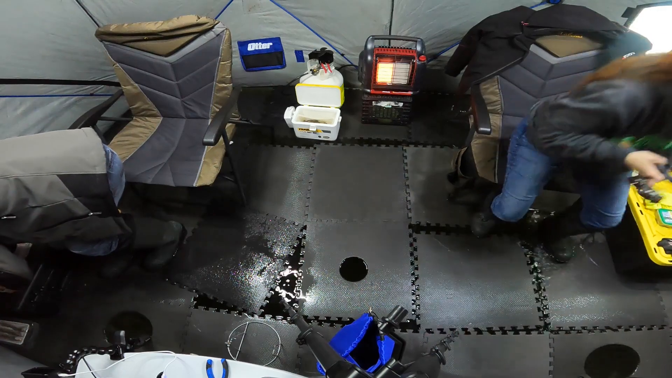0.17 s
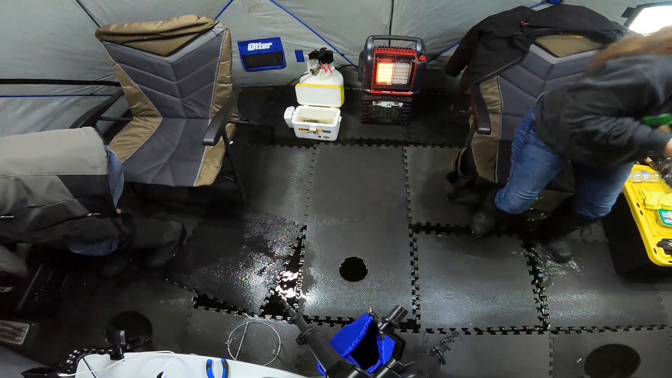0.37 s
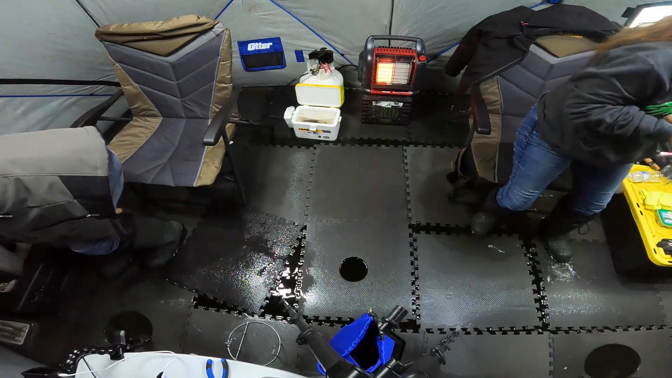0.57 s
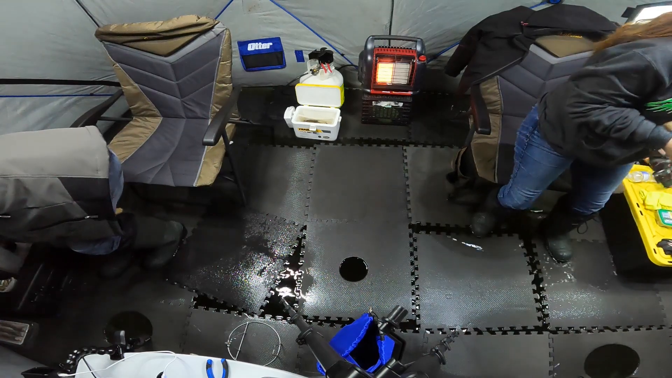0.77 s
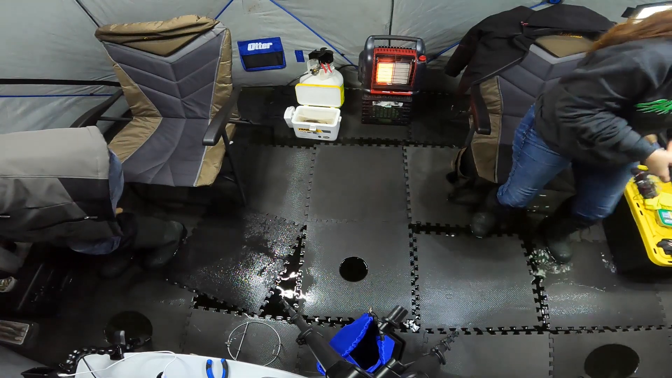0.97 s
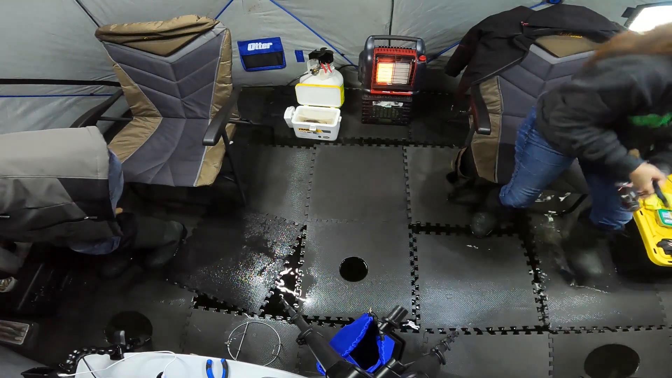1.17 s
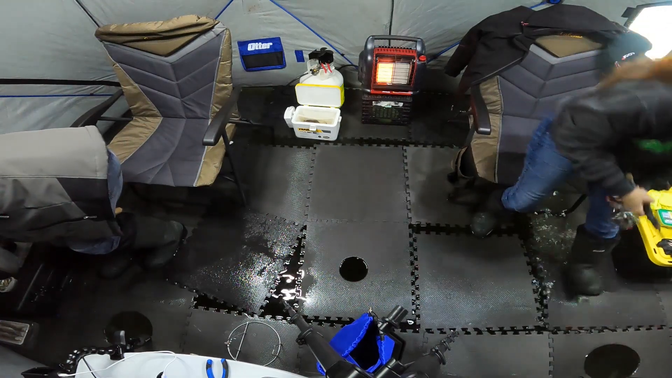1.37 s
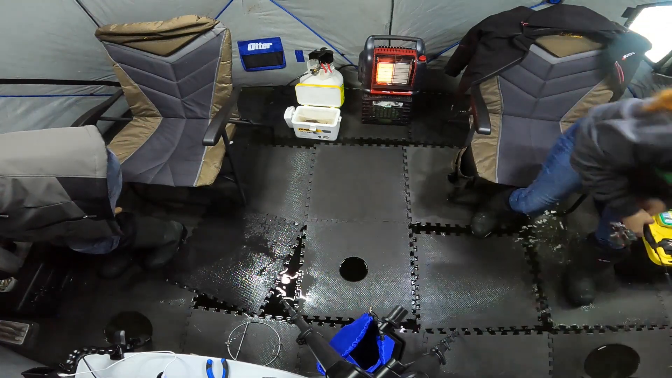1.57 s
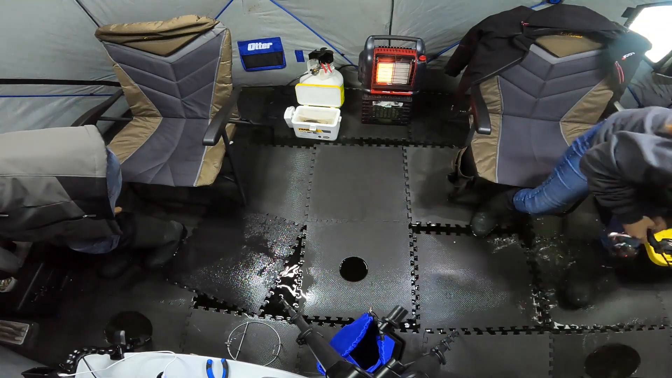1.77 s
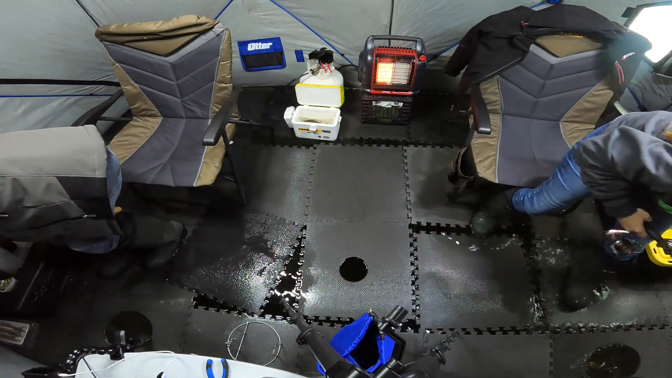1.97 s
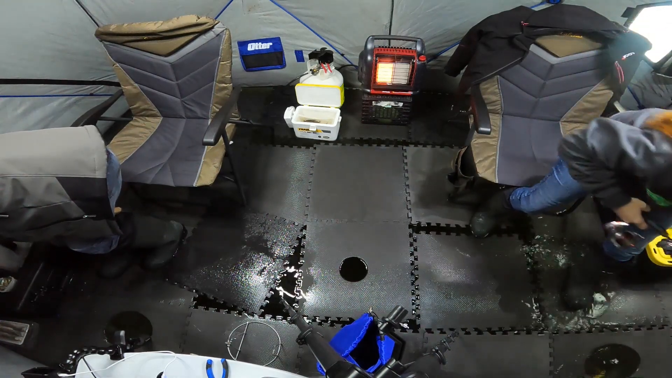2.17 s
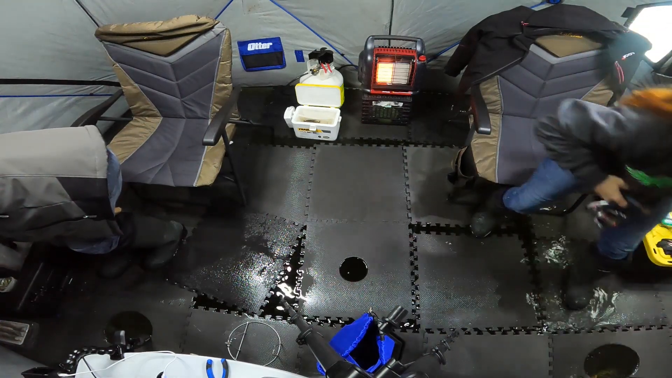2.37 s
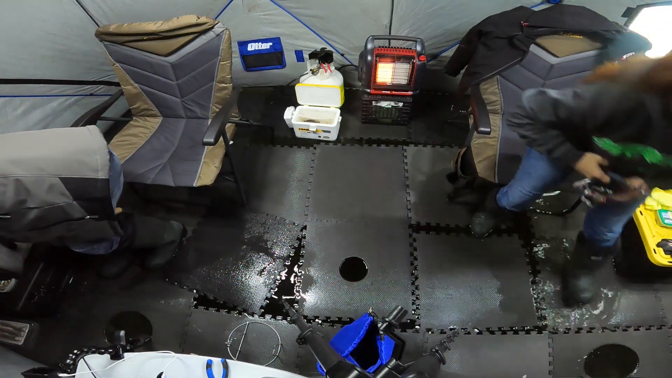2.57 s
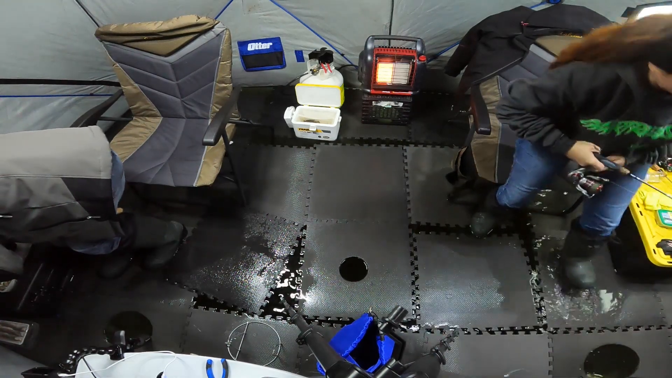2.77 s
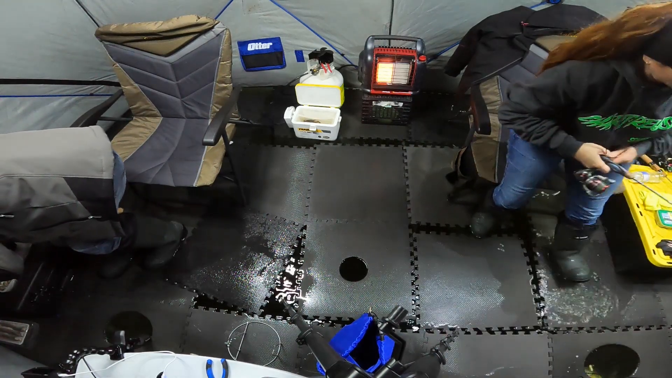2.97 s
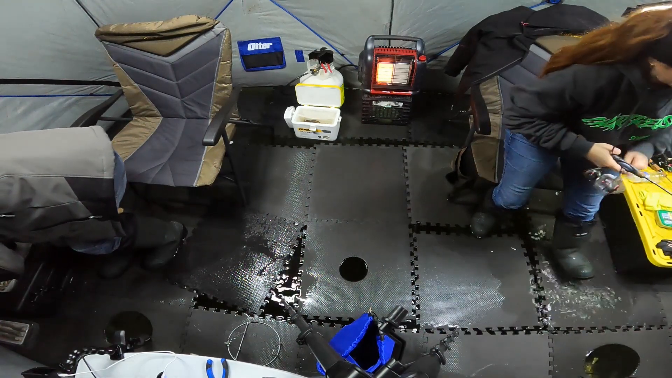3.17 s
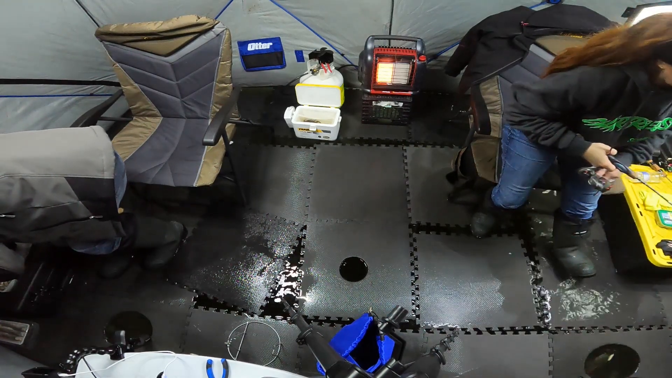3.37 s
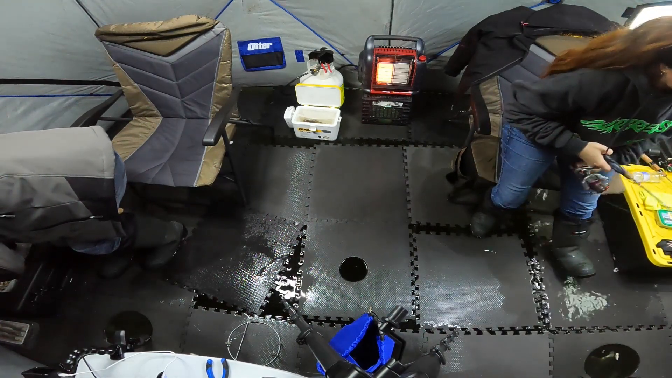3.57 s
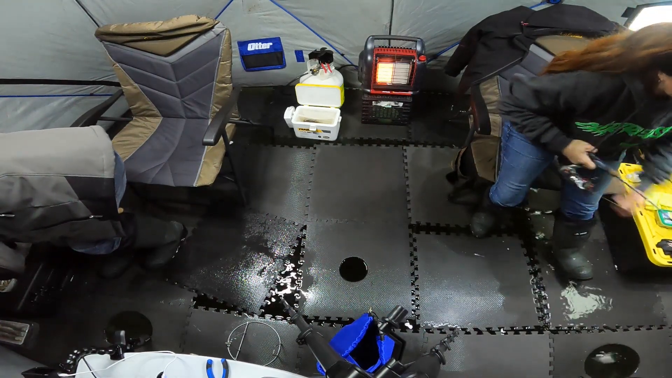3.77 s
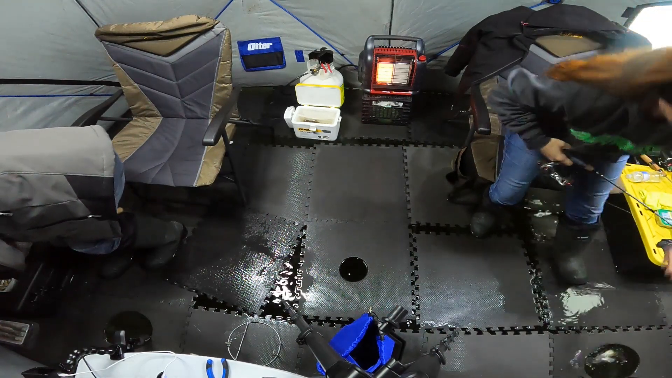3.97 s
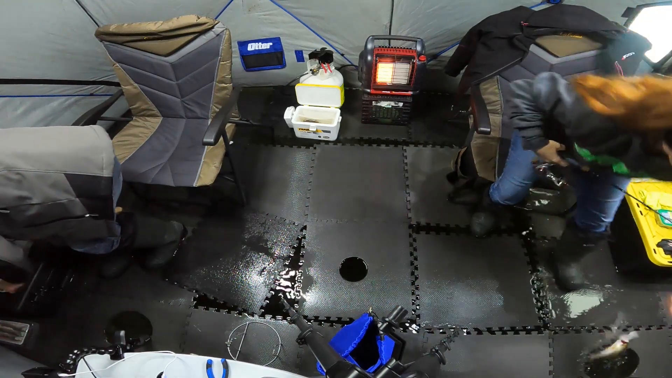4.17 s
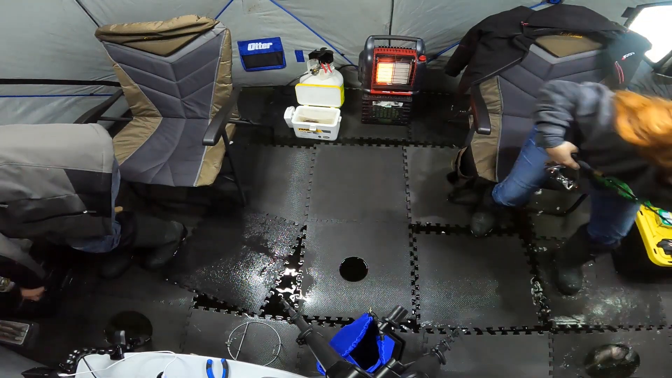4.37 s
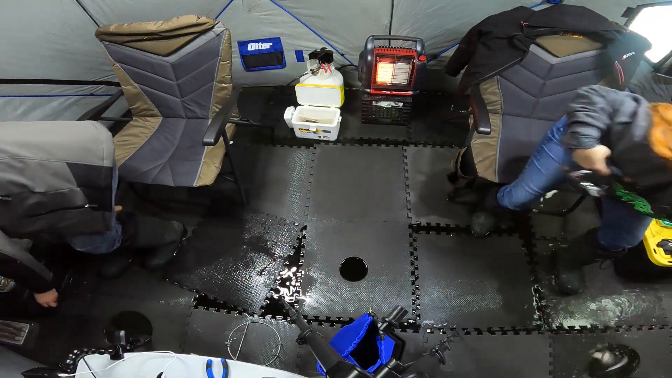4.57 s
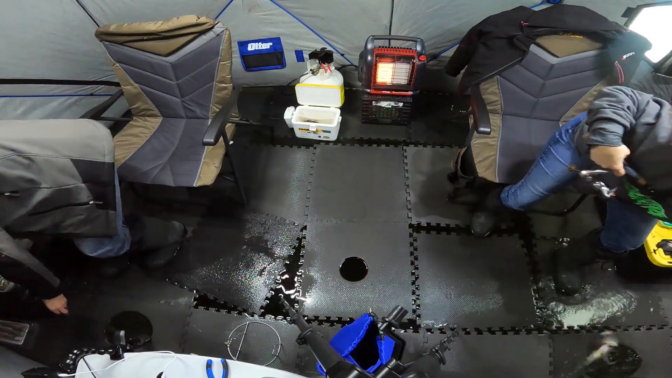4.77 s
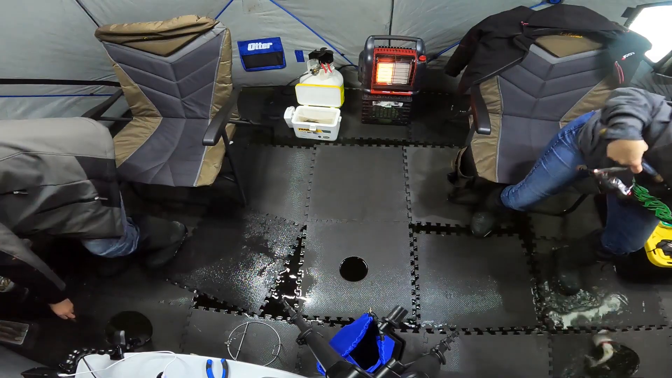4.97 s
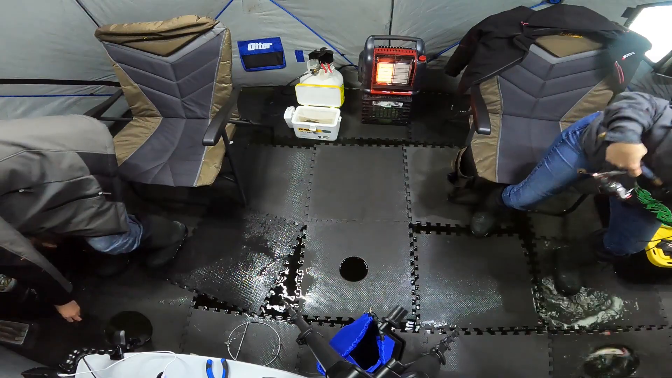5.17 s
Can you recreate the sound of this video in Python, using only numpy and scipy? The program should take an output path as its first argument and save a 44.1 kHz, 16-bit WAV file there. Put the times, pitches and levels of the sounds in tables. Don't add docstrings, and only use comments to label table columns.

```python
import sys
import numpy as np
from scipy import signal
from scipy.fft import rfft, irfft, next_fast_len
from scipy.io import wavfile
from scipy.ndimage import uniform_filter1d

SR = 44100
rng = np.random.default_rng(int(sys.argv[2]) if len(sys.argv) > 2 else 0)


def transcribe(u):
    v = np.clip(np.atleast_2d(u).T, -1, 1)
    q = np.round(v * 32767).astype(np.int16)
    wavfile.write(sys.argv[1], SR, q)


def amplitude_ratio(level_db):
    exponent = np.asarray(level_db, float) / 20
    return 10 ** exponent


N = 229937
T = np.arange(N) / SR

# (frequency [Hz], density [dB per Hz])
HISS = [(12, -23), (20, 4), (163, -9.5), (576, -9.5), (742, -8.5), (877, -15), (1010, -58), (1490, -48),
        (3090, -108), (6230, -52), (8720, -12.5), (9750, -26), (16200, -22)]
# (time [s], level [dB])
SWAY = [
    (0.0, -40.5),
    (0.368, -53),
    (0.45, -58),
    (5.3, -64),
]
# (time [s], peak [dB], rise [s], fall [s])
TREAD = [(0.22, -61.5, 1, 0.17), (1.19, -44, 0.048, 0.054), (1.52, -55, 0.049, 0.26),
         (1.74, -46, 0.23, 0.11), (2.0, -43, 0.058, 0.086), (2.81, -34.5, 0.0073, 0.053),
         (3.12, -53, 0.21, 0.089), (3.56, -62, 0.1, 0.07), (4.25, -51.5, 0.015, 0.15),
         (4.63, -44, 0.037, 0.088), (4.89, -49.5, 0.036, 0.17)]
# (frequency [Hz], density [dB per Hz])
MAT = [(29, -20), (50, 9.5), (65, 1), (140, 11), (183, 3), (263, -4.5), (400, 4), (520, -1.5), (880, -120)]

# (time [s], level [dB])
WINDING = [
    (0.3, -68),
    (0.32, -59),
    (0.514, -44),
    (0.718, -58),
    (0.728, -48.5),
    (1.022, -47.5),
    (1.082, -68),
    (1.16, -48),
]
# (frequency [Hz], width [Hz], level [dB])
REEL_MODES = [(1690, 31, -2.5), (1940, 76, 0), (2280, 60, 2), (2930, 56, 5.5), (4590, 110, 7.5),
              (4930, 570, 6), (5600, 170, 5.5), (6910, 350, 8.5), (7960, 40, -5), (8000, 130, 1),
              (8760, 18, -6)]
# (time [s], level [dB])
ROLLER = [
    (1.18, -56),
    (1.458, -40),
    (1.606, -46),
    (1.7, -54),
]
# (start [s], level [dB], hold [s])
PULLING = [
    (3.315, -51.5, 0.13),
    (3.641, -48.5, 0.11),
]
# (frequency [Hz], width [Hz], level [dB])
DRAG_MODES = [(478, 51, 0.5), (2115, 660, -3), (4700, 420, -2.5), (5600, 300, -3), (6980, 390, 3),
              (7700, 270, -1), (8700, 73, 1.5)]
# (start [s], length [s], level [dB], pitch [Hz])
WHINES = [
    (0.39, 0.3, -61, 1670),
    (0.4, 0.13, -61, 2280),
    (0.846, 0.14, -57.5, 1704),
    (0.9, 0.25, -60.5, 2295),
    (0.97, 0.16, -59, 1990),
]

# (time [s], effort [dB], wetness [dB])
SHUFFLE = [(0.0, -44.5, 0.5), (0.358, -53.5, -5.5), (0.564, -46, -11.5), (0.698, -51.5, -6),
           (1.128, -48.5, -15), (1.33, -42, -14), (1.565, -44.5, -24), (1.62, -38, -11), (1.756, -38.5, -2),
           (1.86, -61.5, 12), (2.028, -46, -0.5), (2.336, -54.5, -6.5), (2.6, -58, 1), (2.844, -49, 1.5),
           (3.28, -55.5, -5), (3.32, -43.5, -16), (3.552, -60, -5.5), (3.9, -60.5, -3)]
# (frequency [Hz], density [dB per Hz])
CLOTH = [(880, -14), (1500, 1.5), (2100, 5), (2640, 1.5), (3070, 1), (4150, 3), (4450, 4.5), (7820, 5.5),
         (9530, -0.5), (11500, -11), (14200, 0), (16300, -21), (17000, -33)]
# (time [s], peak [dB], t60 [s], brightness [dB])
STAMPS = [(0.7303, -18.5, 0.2, -34), (1.172, -28.5, 0.74, -4), (1.304, -30, 0.12, -4),
          (1.351, -34, 0.17, 1), (1.465, -32, 0.23, 4.5), (1.583, -22.5, 0.18, -10),
          (1.713, -26, 0.71, -4.5), (1.8726, -25.5, 0.24, -55), (1.9194, -37.5, 0.37, 9.5),
          (2.195, -28, 0.2, -2), (2.805, -20, 0.071, -33), (2.83, -33.5, 0.37, -4), (2.986, -32, 0.24, -17)]
# (time [s], peak [dB], rise [s], fall [s])
SWISHES = [
    (0.07, -50, 0.075, 0.16),
    (0.55, -52.5, 0.38, 0.35),
    (0.76, -53, 0.063, 0.71),
    (1.35, -48.5, 0.12, 1),
    (1.74, -38, 0.051, 0.06),
    (1.932, -34.5, 0.027, 0.07),
    (2.23, -50, 0.03, 0.075),
    (2.33, -55, 0.04, 0.8),
    (3.0, -50, 0.17, 0.086),
    (3.37, -56, 0.049, 0.082),
]

# (time [s], peak [dB], ring [Hz], t60 [s])
TICKS = [(0.1633, -27, 7600, 0.074), (0.246, -32, 2650, 0.082), (1.5962, -25, 1500, 0.15),
         (1.6688, -30, 2320, 0.041), (1.712, -15.5, 4030, 0.035), (1.7565, -17, 2380, 0.014),
         (1.7622, -26, 2560, 0.055), (1.8741, -32, 3020, 0.024), (1.4735, -28, 2210, 0.026),
         (1.9535, -22.5, 1990, 0.051), (1.9683, -22, 1850, 0.028), (2.1135, -27, 3200, 0.042),
         (2.1958, -32.5, 1460, 0.03), (2.212, -27, 7700, 0.058), (2.5435, -46, 1800, 0.043),
         (2.576, -37, 2270, 0.022), (2.809, -43, 2460, 0.014), (2.8682, -30, 2200, 0.038),
         (3.0046, -30.5, 2260, 0.029), (3.1668, -42, 2200, 0.21), (3.188, -29.5, 7100, 0.077),
         (3.3473, -31.5, 2600, 0.053), (3.807, -36, 4430, 0.019)]
# (time [s], peak [dB], low ring [Hz], high
# ring [Hz])
CLINKS = [(0.7342, -29.5, 2210, 3800), (0.7442, -23.5, 2370, 4500), (1.303, -31, 3230, 7700),
          (1.353, -22.5, 1830, 6240), (1.412, -24.5, 3840, 5500), (1.5785, -27, 2260, 5600),
          (1.9006, -19.5, 2250, 6020), (2.035, -25, 4270, 5600), (2.407, -34, 3870, 5500),
          (2.428, -32.5, 4530, 6060), (2.6702, -35, 6030, 7550), (3.024, -30.5, 2110, 5900),
          (4.041, -21.5, 6220, 8850), (4.515, -19.5, 2600, 7360), (4.8917, -38, 5470, 13600)]
# (time [s], peak [dB], first ring [Hz], second ring [Hz], t60 [s])
RATTLES = [(1.378, -26.5, 1830, 4500, 0.054), (1.399, -39, 1360, 5500, 0.038),
           (1.487, -31, 2270, 5600, 0.024), (1.589, -35, 2600, 5500, 0.04), (1.697, -35, 3900, 6500, 0.028),
           (1.8809, -22, 3100, 1300, 0.053), (2.089, -28, 2180, 4360, 0.02),
           (2.254, -40, 1390, 2110, 0.031), (2.348, -40, 990, 2100, 0.08),
           (2.3725, -40.5, 1580, 2180, 0.23), (2.401, -38, 3700, 4500, 0.047),
           (2.464, -42, 2790, 2230, 0.06), (2.689, -36, 2640, 4400, 0.041), (2.722, -37, 2180, 4200, 0.015),
           (2.7267, -30, 2190, 3150, 0.025), (2.734, -32.5, 1580, 2900, 0.063),
           (2.7576, -28.5, 4710, 5800, 0.054), (2.774, -43, 850, 2300, 0.035),
           (2.813, -34.5, 1490, 4400, 0.15), (2.833, -29.5, 4400, 5800, 0.078),
           (2.88, -31, 1900, 8450, 0.05), (2.906, -31, 4240, 7140, 0.08), (2.943, -34.5, 4370, 5950, 0.28),
           (2.985, -44, 2300, 4500, 0.05), (3.01, -30, 2500, 1540, 0.046),
           (3.188, -32.5, 5600, 8500, 0.062), (4.03, -36, 1010, 2060, 0.083),
           (4.045, -35, 4700, 1380, 0.045), (4.287, -28, 4600, 7000, 0.06), (4.303, -25, 4700, 3480, 0.04),
           (4.316, -29, 2260, 2830, 0.39), (4.411, -31.5, 2400, 3000, 0.04),
           (4.473, -31.5, 2200, 1340, 0.2), (4.696, -29, 2160, 2900, 0.045), (4.728, -31, 1860, 2570, 0.06),
           (4.832, -34, 2470, 3000, 0.056), (4.893, -31, 2020, 1600, 0.057),
           (4.944, -23.5, 1980, 2870, 0.06), (4.975, -9, 8400, 10600, 0.051),
           (5.001, -31, 1880, 2900, 0.06)]
# (time [s], peak [dB], centre
# [Hz])
SNAPS = [(0.729, -15, 1850), (0.735, -16, 2130), (1.352, -25, 1810), (1.413, -14, 3790), (1.578, -24, 2300),
         (1.7555, -17, 2400), (1.352, -21, 6400), (1.902, -14, 2170), (2.727, -21, 2200),
         (2.806, -20, 2480), (3.167, -31, 2120), (3.187, -27, 7140), (0.7295, -18, 4200),
         (0.729, -20, 6200), (0.743, -22, 5800), (0.737, -20, 4500), (1.305, -25, 6500), (1.311, -25, 7300),
         (1.4135, -20, 5500), (1.579, -25, 3000), (1.9705, -22, 2000), (2.113, -28, 3300),
         (1.953, -23, 5500), (2.196, -26, 3000), (2.407, -30, 5000), (2.419, -35, 4800), (2.43, -34, 5500),
         (2.542, -36, 2500), (2.552, -39, 3900), (3.896, -36, 6000), (2.669, -28, 6200),
         (2.6695, -30, 8000), (2.7265, -24, 3500), (2.758, -30, 4700), (3.946, -26, 3000),
         (4.606, -19, 9000), (4.617, -18, 9000), (4.627, -15, 3000), (4.716, -17, 8500), (4.882, -15, 8900),
         (4.974, -14, 10500), (5.028, -14, 8500), (4.628, -11, 8180), (4.95, -7, 7870), (2.172, -28, 3800),
         (2.212, -24, 6000), (1.914, -22, 5000), (1.828, -30, 4000), (4.597, -21, 8000),
         (5.029, -13, 12000), (1.765, -18, 2700), (4.985, -12, 7830)]

# (time [s], peak [dB], pitch [Hz], t60 [s])
GULPS = [(0.003, -34.5, 1420, 0.059), (0.054, -39, 810, 0.03), (0.212, -41, 382, 0.05),
         (0.235, -35, 420, 0.045), (0.735, -28.5, 786, 0.071), (1.173, -29, 446, 0.017),
         (1.284, -37, 906, 0.044), (1.619, -32.5, 780, 0.049), (1.675, -33, 474, 0.11),
         (1.987, -31, 774, 0.081), (2.004, -28, 620, 0.044), (2.028, -26, 512, 0.053),
         (2.087, -33.5, 461, 0.14), (2.805, -18.5, 757, 0.026), (2.819, -19.5, 810, 0.016),
         (2.907, -32, 820, 0.033), (3.944, -32.5, 817, 0.06), (4.017, -36, 480, 0.053),
         (4.169, -32.5, 1157, 0.068), (4.481, -28, 720, 0.12), (4.165, -37.5, 700, 0.041),
         (4.545, -35.5, 835, 0.15), (4.564, -33.5, 1207, 0.088), (4.659, -29, 643, 0.023),
         (4.728, -29.5, 900, 0.023), (4.777, -31, 453, 0.02), (4.971, -27, 1280, 0.065),
         (5.086, -32.5, 824, 0.038), (4.47, -37, 770, 0.037), (4.495, -37, 690, 0.069),
         (4.589, -32, 1030, 0.049), (4.512, -35, 710, 0.03), (4.665, -36, 902, 0.051),
         (4.745, -32, 795, 0.036), (4.79, -37, 385, 0.059), (4.82, -42, 517, 0.067),
         (2.945, -41, 880, 0.07)]
# (time [s], peak [dB], pitch [Hz], t60 [s])
THUMPS = [
    (1.17, -46, 263, 0.12),
    (2.802, -36.5, 243, 0.1),
    (2.812, -39.5, 409, 0.12),
    (4.625, -39, 306, 0.079),
    (1.49, -37, 105, 0.3),
    (1.65, -41, 142, 0.19),
    (1.721, -50, 147, 0.12),
    (1.934, -47, 134, 0.42),
    (3.08, -50, 110, 0.44),
]
# (time [s], peak [dB], pitch [Hz], t60 [s])
DRIPS = [
    (1.357, -35, 1810, 0.068),
    (1.384, -34, 1370, 0.071),
    (1.758, -26.5, 2710, 0.11),
    (2.122, -28.5, 2660, 0.047),
    (2.173, -30, 3800, 0.097),
    (3.955, -43, 376, 0.17),
    (4.003, -27.5, 9000, 0.1),
    (4.737, -31, 1790, 0.166),
    (5.085, -35.5, 1280, 0.12),
]

# (time [s], peak [dB], ring [Hz], t60 [s])
SLAPS = [(3.924, -39, 1720, 0.14), (3.9487, -31.5, 2730, 0.19), (4.151, -21.5, 3250, 0.11),
         (4.242, -19.5, 5270, 0.056), (4.439, -21.5, 2330, 0.048), (4.5585, -25.5, 2540, 0.069),
         (4.605, -27, 4200, 0.02), (4.6293, -24, 2380, 0.013), (4.737, -28.5, 1870, 0.13),
         (4.9862, -15.5, 2070, 0.028), (5.0186, -28, 2280, 0.061), (5.0434, -22, 5150, 0.035)]
# (time [s], peak [dB], first ring [Hz], second ring [Hz], t60 [s])
FLICKS = [
    (3.948, -27, 13400, 3980, 0.19),
    (4.011, -19.5, 8900, 13000, 0.036),
    (4.398, -18.5, 6850, 9000, 0.062),
    (4.436, -18.5, 6960, 8500, 0.081),
    (4.635, -14, 12900, 8550, 0.27),
]
# (time [s], peak [dB], t60 [s])
SURGES = [
    (3.897, -33, 0.16),
    (3.9454, -56, 0.97),
    (4.2098, -23.5, 0.64),
    (4.626, -8, 0.052),
    (4.881, -11.5, 0.27),
    (4.942, -27, 0.56),
    (5.128, -11.5, 0.36),
]
# (time [s], spray peak [dB], rise [s], fall [s])
LASHES = [(3.955, -35.5, 0.056, 0.29), (4.04, -43, 0.051, 0.18), (4.16, -38.5, 0.029, 0.22),
          (4.245, -42, 0.061, 0.14), (4.29, -32.5, 0.025, 0.13), (4.324, -29, 0.061, 0.062),
          (4.4, -35.5, 0.086, 0.16), (4.46, -31.5, 0.079, 0.27), (4.52, -40, 0.088, 0.084),
          (4.61, -31.5, 0.046, 0.056), (4.64, -26, 0.024, 0.081), (4.705, -24.5, 0.089, 0.15),
          (4.8, -39, 0.068, 0.27), (4.9, -28.5, 0.05, 0.069), (4.955, -22.5, 0.052, 0.05),
          (4.977, -28.5, 0.044, 0.097), (5.02, -25, 0.044, 0.077), (5.045, -33, 0.051, 0.14),
          (5.143, -30.5, 0.045, 0.095)]
# (frequency [Hz], density [dB per Hz])
SPRAY = [(2350, -28), (4000, -9.5), (4600, -4.5), (6930, -4.5), (8300, 3.5), (9600, -1.5), (11400, -7.5),
         (12800, -2), (14200, 1.5), (15100, -4), (15900, -6), (16300, -50), (17000, -47)]

# (frequency [Hz], side minus mid [dB])
PORTS = [(40, -9.5), (125, -17.5), (500, -15.5), (1300, -14.5), (2400, -17), (3500, -11), (4800, -11.5),
         (6500, -10), (8100, -5), (11000, 6.5), (14500, 0.5)]


def level(x, db):
    return x * amplitude_ratio(db) / np.sqrt(np.mean(x ** 2))


def colour(x, table):
    size = next_fast_len(len(x) + 4096)
    hz, db = np.transpose(table)
    log_hz = np.log(np.arange(size // 2 + 1) * SR / size + 1)
    curve = amplitude_ratio(np.interp(log_hz, np.log(hz), db))
    return irfft(rfft(x, size) * curve, size)[:len(x)]


def ring(x, hz, width):
    return signal.lfilter(*signal.iirpeak(min(hz, .45 * SR), max(hz / width, .3), fs=SR), x)


def decay(t, t60):
    return np.exp(-np.log(1000) * t / t60)


def gain(table, col):
    rows = np.vstack(table)
    return amplitude_ratio(np.interp(T, rows[:, 0], rows[:, col], left=-200, right=-200))


def swells(table):
    t = T[::16]
    total = np.zeros(len(t))
    for s, db, rise, fall in table:
        away = np.where(t < s, (s - t) / max(rise, .003), (t - s) / max(fall, .003))
        total += amplitude_ratio(db - 20 * away)
    return np.interp(T, t, total)


def burst(s, db, t60):
    return amplitude_ratio(db - 13.5) * (T >= s) * decay(np.maximum(T - s, 0), t60)


def walk(rate):
    k = int(SR / rate)
    held = np.repeat(rng.standard_normal(N // k + 1), k)
    return 1.405 * uniform_filter1d(uniform_filter1d(held, k), k)[:N]


def grit(rate, spread_db, smooth):
    hit, size, sign = rng.random((3, N))
    clicks = (hit < rate / SR) * amplitude_ratio(-spread_db * np.log(size + 0.015)) * np.sign(sign - .5)
    return level(clicks, 0) + smooth * rng.standard_normal(N)


def patchy(x, table, depth_db, rate):
    size = next_fast_len(N)
    full = rfft(colour(x, table), size)
    octave = np.log2(np.arange(1, size // 2 + 2) * SR / size)
    out = np.zeros(N)
    for centre in np.arange(10, 14.6, .5):
        share = np.cos(np.pi / 2 * np.clip(2 * (octave - centre), -1, 1)) ** 2
        out += irfft(full * share, size)[:N] * amplitude_ratio(depth_db * walk(rate))
    return out


def add(out, s, db, x):
    i = int(s * SR)
    x = x[:N - i]
    out[i:i + len(x)] += amplitude_ratio(db) * x / np.max(np.abs(x))


def tent():
    hiss = level(colour(rng.standard_normal(N), HISS), -57) * amplitude_ratio(0.83 * walk(1.69))
    turn = 2 * np.pi * np.cumsum(39.5 * (1 + walk(7) / 40)) / SR
    hum = amplitude_ratio(-52.5 + 0.79 * walk(6.3)) * (np.sin(turn) + amplitude_ratio(-18.0) * np.sin(4 * turn))
    standing = amplitude_ratio(-69.5)
    tread = level(colour(rng.standard_normal(N), MAT), 0) * (swells(TREAD) + standing)
    sway = level(ring(ring(rng.standard_normal(N), 20.5, 18.0), 18.5, 20.0), 0) * gain(SWAY, 1)
    air = level(ring(ring(rng.standard_normal(N), 11.3, 12.0), 12.0, 11.0), -58.0)
    return hiss + hum + tread + sway + air


def echo(x, t60, start):
    t = T[:8192]
    tail = rng.standard_normal(8192) * decay(t, max(t60, .003)) * (t >= start)
    return signal.fftconvolve(x, tail / np.sqrt(np.sum(tail ** 2)))[:N]


def whines():
    edge_s = 0.024
    waver = np.cumsum(1 + 0.0068 * walk(39.76)) / SR
    out = np.zeros(N)
    for s, length, db, hz in WHINES:
        gate = np.clip(np.minimum(T - s, s + length - T) / edge_s, 0, 1)
        out += amplitude_ratio(db + 4.0 * walk(40.4)) * gate * np.sin(2 * np.pi * hz * waver)
    return out


def pulls():
    attack_s, release_s = 0.041, 0.088
    out = np.zeros(N)
    for s, db, hold in PULLING:
        away = np.maximum((s - T) / attack_s, (T - s - hold) / release_s)
        out += amplitude_ratio(db - 20 * np.maximum(away, 0))
    return out


def reel_modes(teeth, modes):
    out = np.zeros(N)
    for hz, width, db in modes:
        mode = ring(ring(teeth, hz, width), hz, max(width, hz / 8))
        out += amplitude_ratio(db + 2.5 * walk(5.09)) * mode
    return level(out, 4.94)


def reel():
    teeth = grit(2500, 0.75, 0.66) * amplitude_ratio(walk(28.65))
    body = reel_modes(teeth, REEL_MODES) * gain(WINDING, 1)
    drag = reel_modes(teeth, DRAG_MODES) * pulls()
    roller = level(ring(teeth, 6950.0, 350.), -1.6) * gain(ROLLER, 1)
    return roller + body + drag


def shuffle(slosh, gulp):
    rasp = patchy(grit(2500, 2.45, 0.48), CLOTH, 3.26, 34.95)
    high = signal.butter(N=4, Wn=9500, btype="high", fs=SR, output="sos")
    low = signal.butter(N=4, Wn=9500, fs=SR, output="sos")
    top = level(signal.sosfilt(high, rasp), 0)
    body = level(signal.sosfilt(low, rasp), 0)
    wet = level(gulp + 1.0 * slosh, 0)
    stamp = np.zeros(N)
    for s, db, t60, bright_db in STAMPS:
        splash = slosh + 0.16 * gulp + amplitude_ratio(bright_db) * (body + 0.048 * top)
        stamp += burst(s, db, t60) * splash
    effort = gain(SHUFFLE, 1)
    treble = amplitude_ratio(-12) * (effort * amplitude_ratio(27)) ** 0.096
    moving = effort * (body + treble * top + gain(SHUFFLE, 2) * wet)
    return stamp + moving + swells(SWISHES) * top


def spatter():
    drops = grit(90, 4, 0)
    t = T[:512]
    tail = rng.standard_normal(512) * np.exp(-t / .002) * .3 + (t == 0)
    return level(ring(signal.fftconvolve(drops, tail)[:N], 3550, 5100.0), -17.5)


def snaps():
    out, t = np.zeros(N), T[:256]
    for s, db, hz in SNAPS:
        swing = np.sin(2 * np.pi * hz * t + 1) * np.exp(-t * hz / 1.5)
        add(out, s + .001, db - 2, ring(swing, hz, hz))
    return out


def clacks(table, crack_db):
    out, t = np.zeros(N), T[:4096]
    strike = t == 0
    for s, db, low_hz, high_hz, high_db, t60 in table:
        chatter, crackle = rng.standard_normal((2, 4096))
        push = chatter * decay(t, max(t60, .004)) + 7.65 * strike
        low = ring(ring(push, low_hz, 0.19 * low_hz), low_hz, low_hz / 4)
        high = ring(ring(push, high_hz, 0.19 * high_hz), high_hz, high_hz / 4)
        crack = ring(crackle * np.exp(-t / .0005) + 4.0 * strike, 3500., 6000.)
        parts = ((0, low), (high_db, high), (crack_db, crack))
        add(out, s, db, sum(amplitude_ratio(d) * v / np.max(np.abs(v)) for d, v in parts))
    return out


def tackle():
    rows = [(s, db, hz, 7700, -29, t60) for s, db, hz, t60 in TICKS]
    rows += [(s, db, hz, 8240, -15, t60) for s, db, hz, t60 in SLAPS]
    rows += [(*row, 4.5, 0.079) for row in CLINKS]
    rows += [(s, db, first_hz, second_hz, -3, t60) for s, db, first_hz, second_hz, t60 in RATTLES + FLICKS]
    return clacks(sorted(rows), 1.46)


def gulps():
    out, t = np.zeros(N), T[:8192]
    rise = 0.08
    for s, db, hz, t60 in GULPS + THUMPS + DRIPS:
        detune, phase = rng.random(2)
        fade_s = max(t60, .01)
        turn = 2 * np.pi * hz * (t * (1 - rise / 2) + rise * t ** 2 / fade_s)
        tone = np.sin(turn) + 0.38 * np.sin(turn * (1.2 + 0.32 * detune) + 6 * phase)
        tone = tone + .5 * level(ring(rng.standard_normal(8192), hz, hz / 2), -3)
        onset = 1 - np.exp(-t / max(0.0015, 4.6 / hz - 0.0105))
        add(out, s, db, tone * onset * decay(t, fade_s))
    return out


def bubbles(lo_hz, hi_hz, cycles, spread_db, count):
    out = np.zeros(N + 4096)
    for at, pitch, size in rng.random((count, 3)):
        hz, i = lo_hz * (hi_hz / lo_hz) ** pitch, int(at * N)
        t = T[:min(int(5 * cycles * SR / hz), 4096)]
        fade = np.exp(-t * hz / cycles)
        glide = 1 + 0.043 * t * hz / cycles
        peak = amplitude_ratio(-spread_db * np.log(size + 0.0072))
        out[i:i + len(t)] += peak * fade * np.sin(2 * np.pi * hz * t * glide)
    return level(out[:N], 0)


def sloshing():
    rush = level(ring(rng.standard_normal(N), 1680.0, 3000.0), 0)
    return level(bubbles(1583, 5850, 7.25, 1.26, count=2500) + 1.3 * rush, 0)


def gulping():
    rush = level(ring(rng.standard_normal(N), 980.0, 1200.0), 0)
    return level(bubbles(474.0, 1552, 5.8, 4.6, count=800) + .5 * rush, 0)


def fish(slosh, gulp):
    droplets = patchy(grit(2000, 1.4, 0.98), SPRAY, 1.14, 45)
    spray = level(droplets * amplitude_ratio(0.86 * walk(150)), -2.6)
    surge = sum(burst(*row) for row in SURGES)
    lash = swells(LASHES)
    churn = np.clip((T - 3.9) / 0.0062, 0, 1)
    water = amplitude_ratio(-41.5) * (lash * amplitude_ratio(29.5)) ** 0.67 * slosh
    water = water + amplitude_ratio(-57.5) * (lash * amplitude_ratio(31)) ** 0.22 * gulp
    return surge * (spray + 0.081 * slosh) + lash * spray + churn * water


def scene():
    slosh, gulp = sloshing(), gulping()
    hits = tackle() + gulps() + snaps()
    mid = tent() + reel() + whines() + shuffle(slosh, gulp) + fish(slosh, gulp)
    mid = mid + hits + amplitude_ratio(-9) * echo(hits, t60=0.16, start=0.00622)
    mid = mid + spatter() * (gain(SHUFFLE, 1) * (T > 1.15) + 0.16 * swells(LASHES))
    wander = 1j * np.exp(1.3j * walk(300))
    turned = np.real(signal.hilbert(mid, next_fast_len(N))[:N] * wander)
    side = colour(turned, PORTS)
    return np.array([mid + side, mid - side])


def low_pass(x):
    return signal.sosfilt(signal.butter(12, 15950, fs=SR, output="sos"), x)


def record(dry):
    top = signal.ellip(10, .2, 80, 15800, fs=SR, output="sos")
    mix = signal.sosfilt(top, dry)
    return low_pass(mix)


dry = scene()
out = record(dry)
transcribe(out)
```